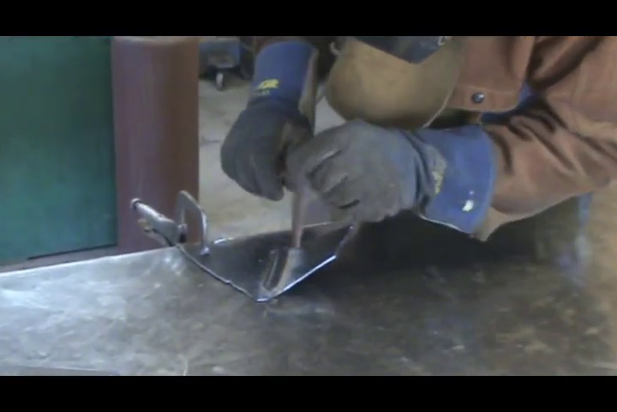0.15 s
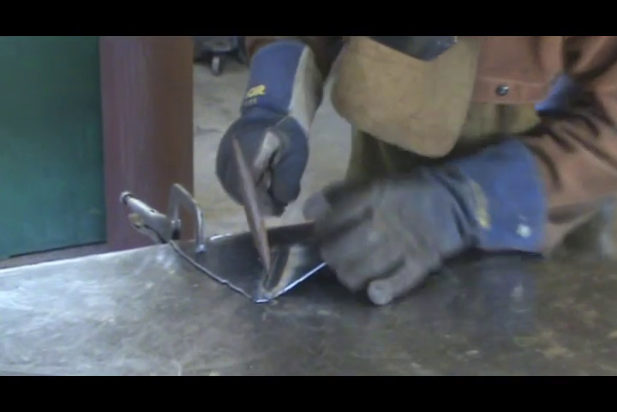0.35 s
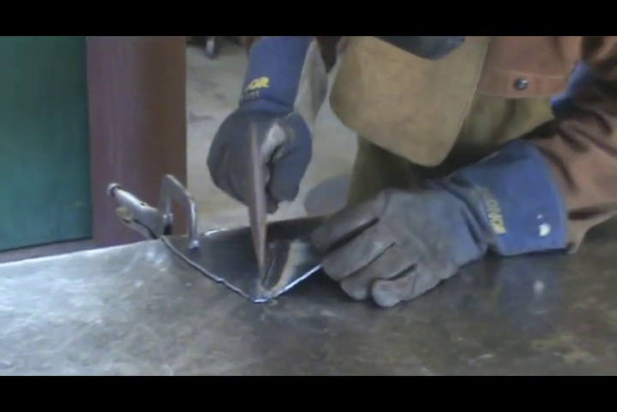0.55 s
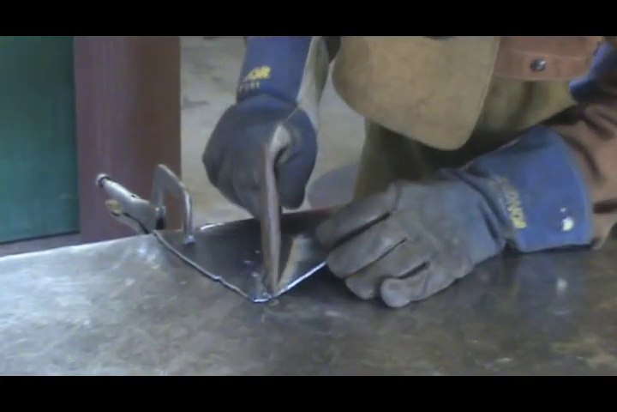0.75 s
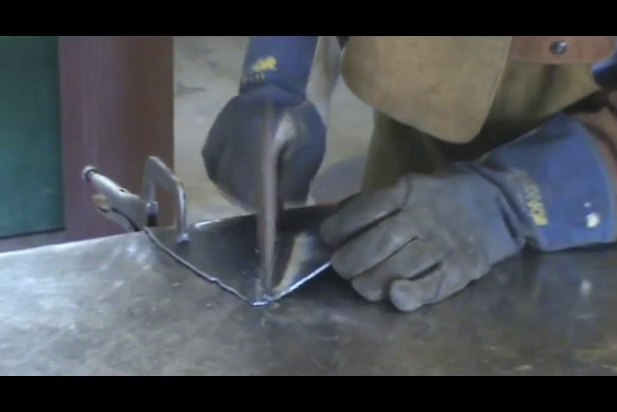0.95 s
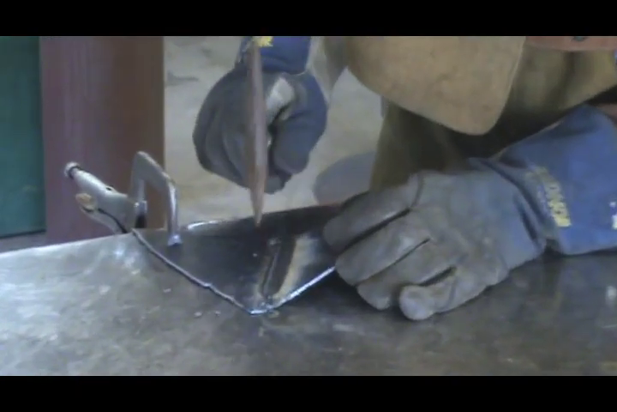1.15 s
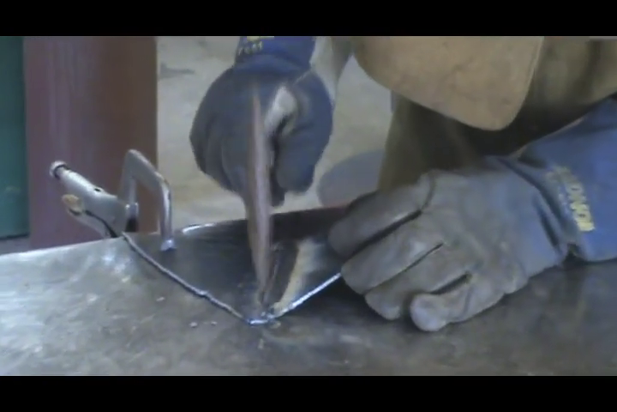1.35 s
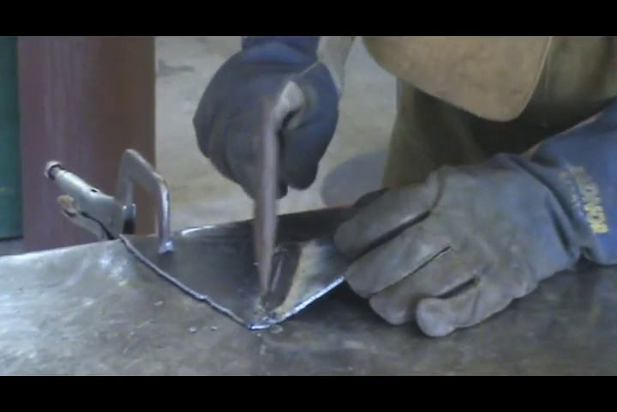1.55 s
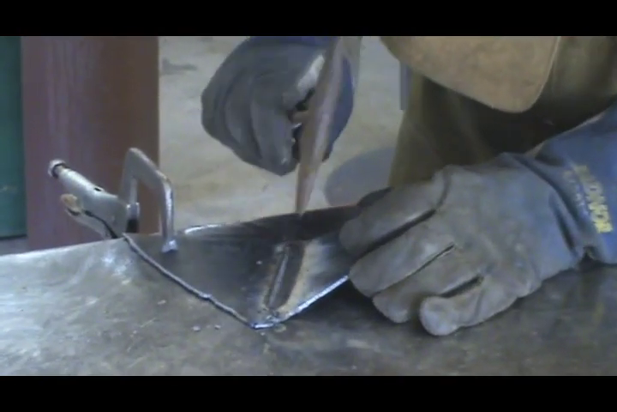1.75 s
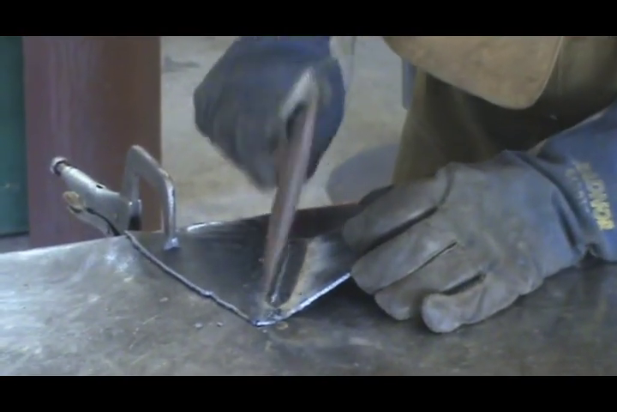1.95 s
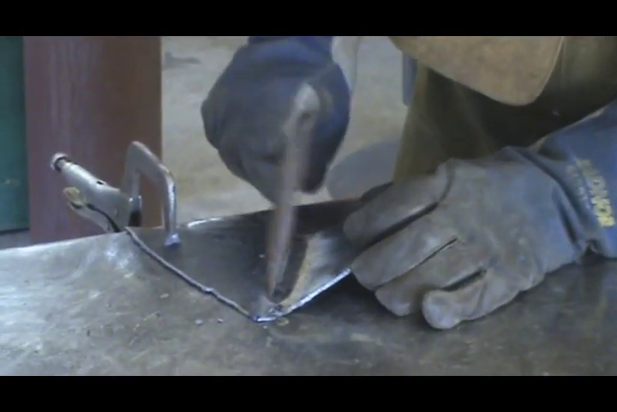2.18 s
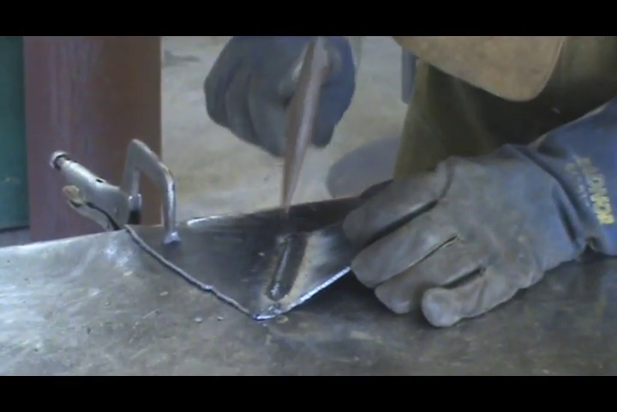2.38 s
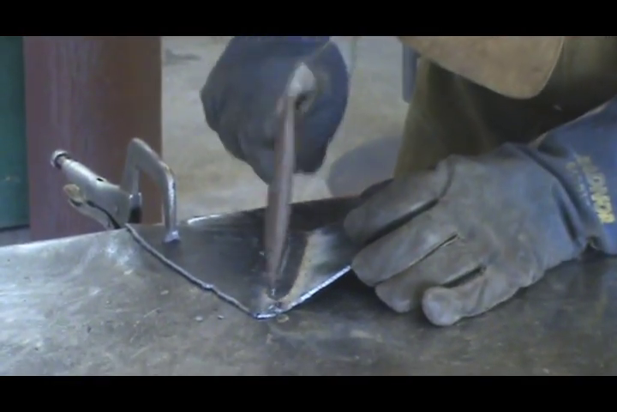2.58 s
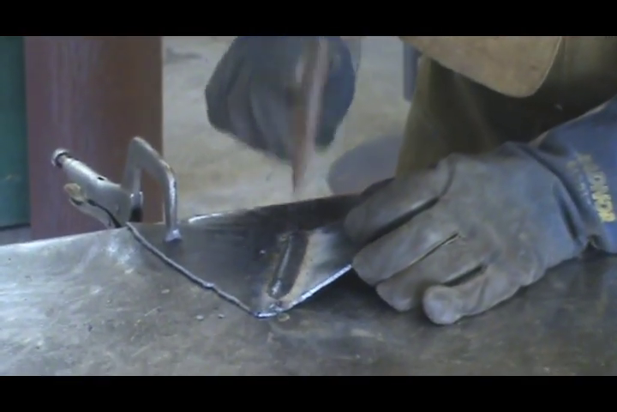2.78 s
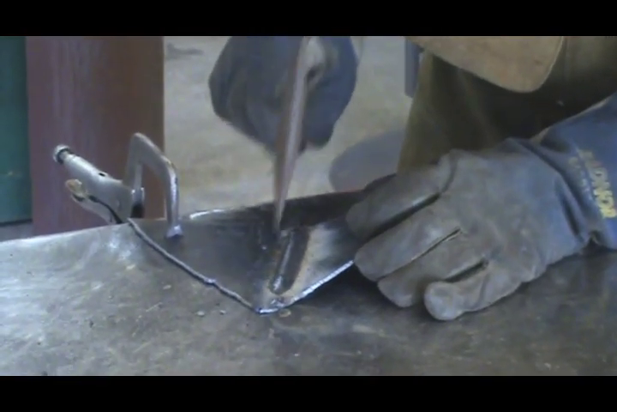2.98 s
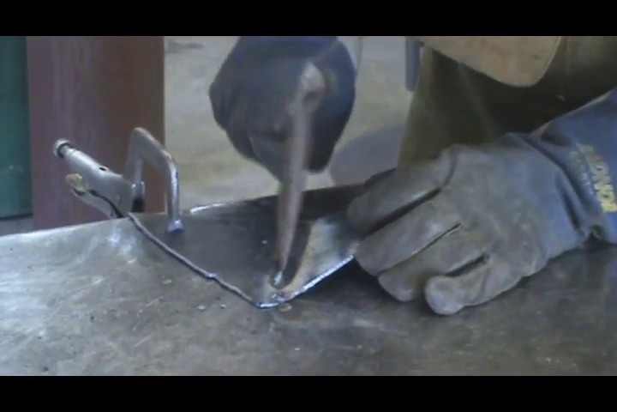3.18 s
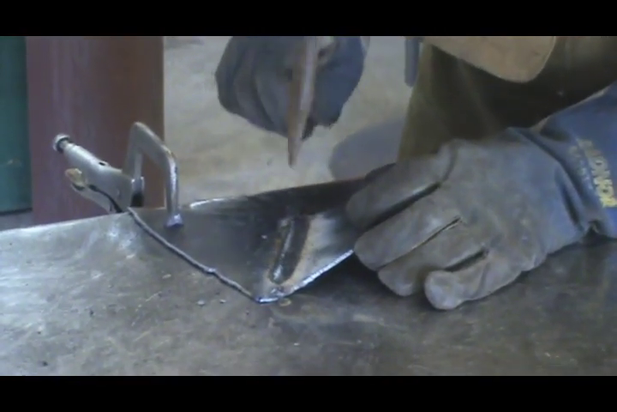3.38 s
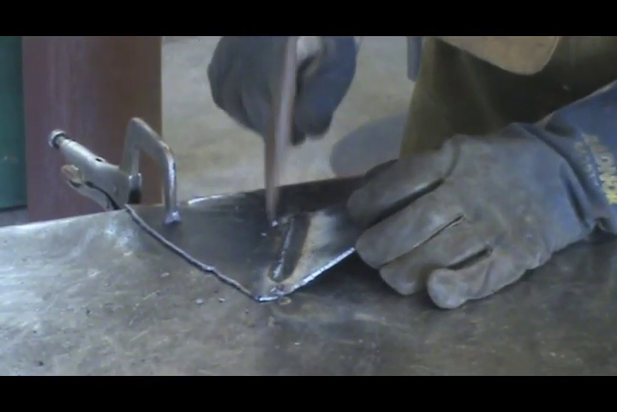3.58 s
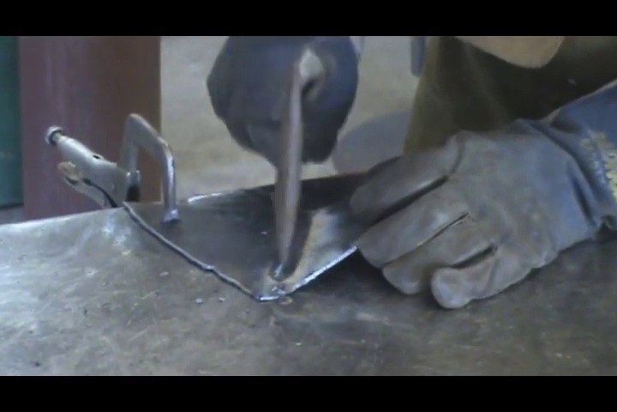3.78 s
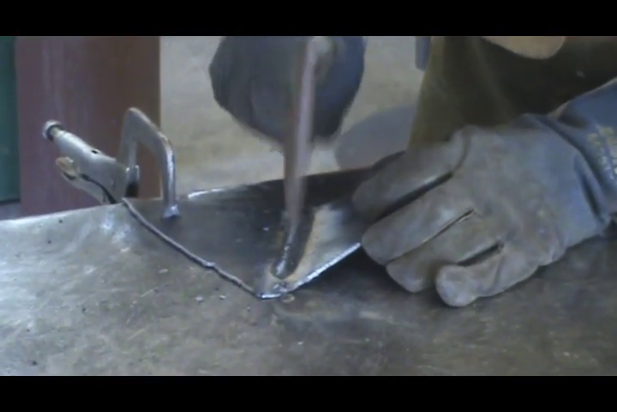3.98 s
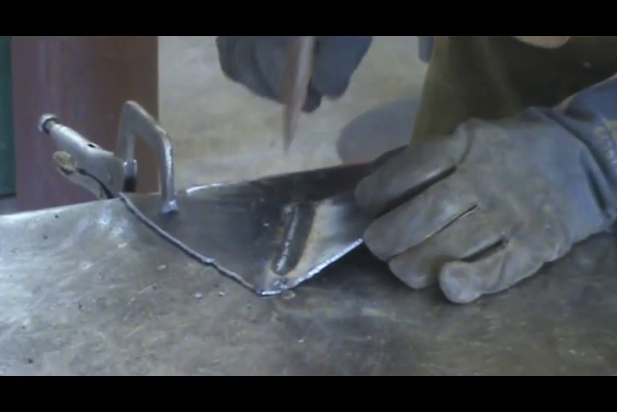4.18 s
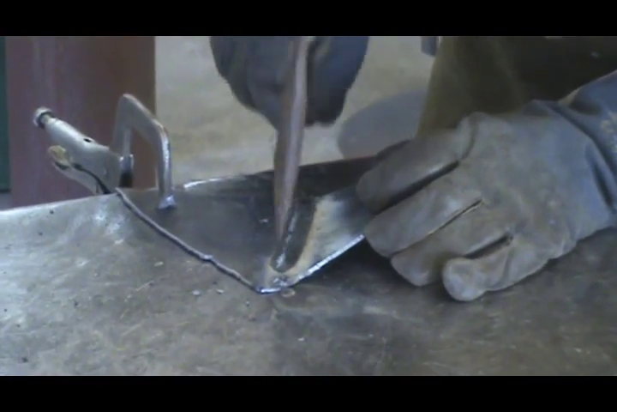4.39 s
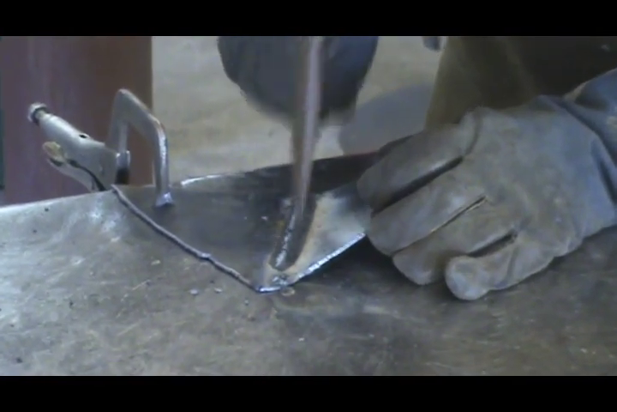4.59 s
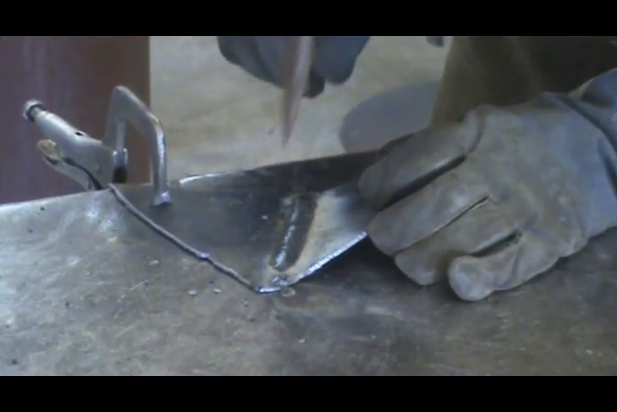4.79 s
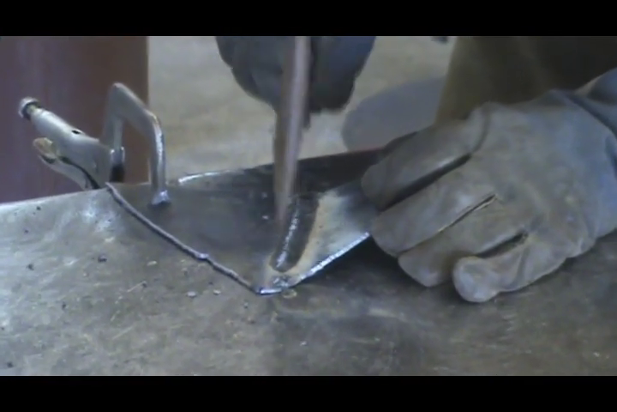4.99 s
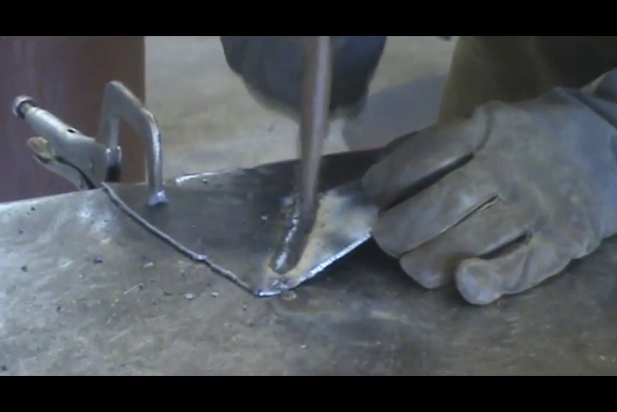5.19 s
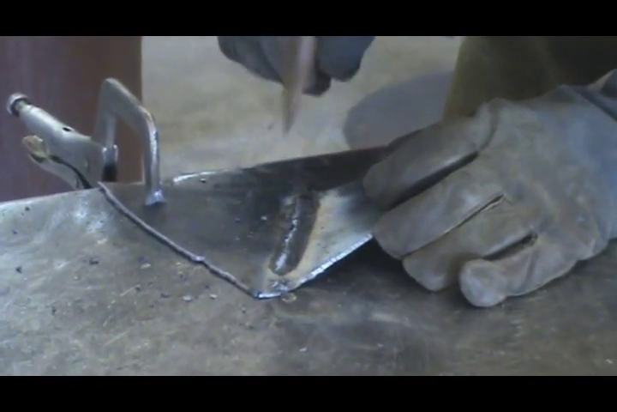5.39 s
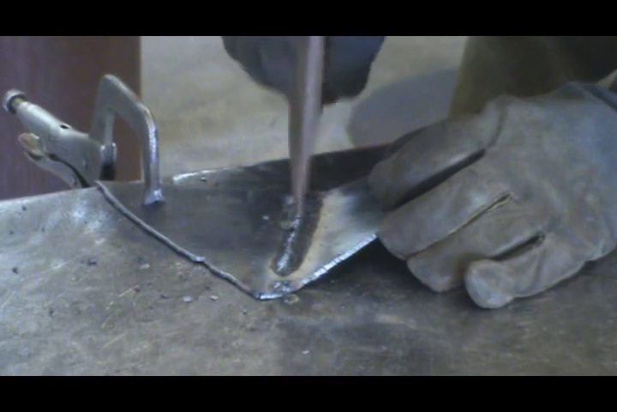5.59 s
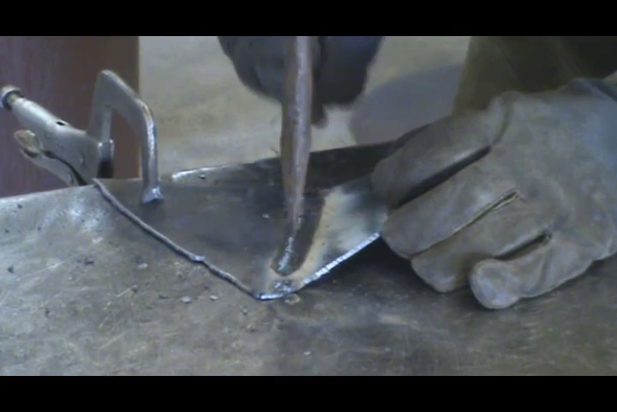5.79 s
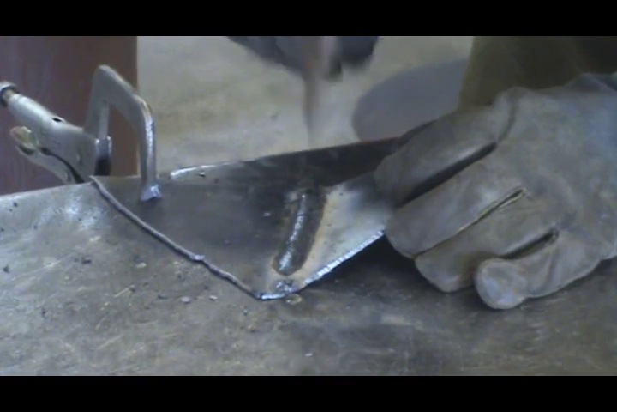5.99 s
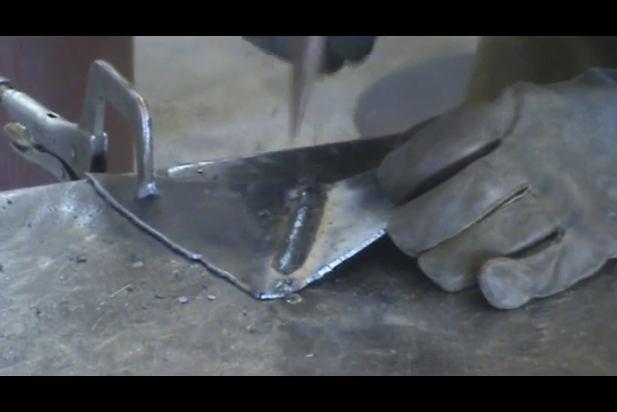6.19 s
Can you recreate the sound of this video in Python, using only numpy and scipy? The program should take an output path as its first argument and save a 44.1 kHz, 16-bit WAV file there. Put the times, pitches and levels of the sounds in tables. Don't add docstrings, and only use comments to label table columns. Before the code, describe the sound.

After a second of glove rustle and faint ticks, sharp metallic hammer blows crack slag off a weld, the plate chattering and ringing.

```python
import sys
import numpy as np
from scipy import signal
from scipy.fft import rfft, irfft
from scipy.io import wavfile
from scipy.ndimage import uniform_filter1d

SR = 44100
rng = np.random.default_rng(int(sys.argv[2]) if len(sys.argv) > 2 else 0)


def inscribe(sig):
    pcm = np.round(np.clip(np.atleast_2d(sig).T, -1, 1) * 32767)
    wavfile.write(sys.argv[1], SR, pcm.astype(np.int16))


def ratio(d):
    e = np.asarray(d, float) / 20
    return 10 ** e


N = 275625
NOISE_HZ = np.fft.rfftfreq(256, 1 / SR)


def evened(x):
    return x / np.sqrt(np.mean(x ** 2) + 1e-20)


def read(points, hz):
    f, value = np.transpose(points)
    return np.interp(np.log(hz + 1), np.log(f + 1), value)


def add(mix, s, sound):
    part = mix[round(s * SR):][:len(sound)]
    part += sound[:len(part)]


def noise(size, shape_db, patchy_db):
    hz = NOISE_HZ[:, None]
    t = np.arange(size // 64 + 5) * 64 / SR
    a, b, patches = rng.standard_normal((len(t), len(hz), 3)).T
    patches = uniform_filter1d(patches, size=3, axis=0)
    patches = evened(uniform_filter1d(patches, size=8, axis=1))
    spectra = (a + 1j * b) * ratio(shape_db(hz, t) + patchy_db * patches)
    return signal.istft(spectra, nperseg=256, noverlap=192)[1][:size]


def ring(t, hz, db, t60, spread_db):
    chance = rng.standard_normal((len(hz), 2))
    start_db = db + spread_db * chance[:, 0]
    level = ratio(start_db[:, None] - 60 * t / np.maximum(t60, .01)[:, None])
    return (level * np.sin(2 * np.pi * hz[:, None] * t + 2 * chance[:, 1:])).sum(0)


# f/Hz, level/dB per Hz
AIR = [(18, -6), (30, 2), (173, -3), (700, -6), (1430, -6), (1790, -8.5), (5910, -18.5), (6550, -15),
       (7070, -22), (11700, -21), (13000, -44)]


def shop():
    white = rfft(rng.standard_normal(N))
    coloured = irfft(white * ratio(read(AIR, np.fft.rfftfreq(N, 1 / SR))), N)
    return ratio(-46.5) * evened(coloured)


def strokes(rows, t):
    s, db, swell, fade = np.transpose(rows)[:, :, None]
    below_top_db = np.where(t < s, swell * (s - t), fade * (t - s))
    return np.sqrt((ratio(db - below_top_db) ** 2).sum(0))


# f/Hz, level/dB per Hz
RUSTLE_COLOUR = [(590, -54), (1000, -24), (1250, -3), (1880, -18), (2140, -3), (8020, -9), (12300, -19),
                 (13000, -48)]
# f/Hz, level/dB per Hz
RUB_COLOUR = [(88, -50), (150, -17), (566, 0), (927, -9), (1030, -10), (1860, -3), (3830, -15.5),
              (6000, -32), (7800, -67), (13200, -120)]
# loudest at t/s, level/dB, swell/dB per s, fade/dB per s
RUSTLE_STROKES = [
    (0.2, -41.5, 697, 170),
    (0.398, -42.5, 180, 2500),
    (0.624, -45, 2500, 100),
    (0.705, -38.5, 178, 151),
    (0.82, -48, 300, 600),
]
# t/s, level/dB, swell/dB per s, fade/dB per s
RUB_STROKES = [
    (0.0, -31, 300, 111),
    (0.2, -44, 500, 150),
    (0.5, -54, 150, 150),
    (0.622, -43, 2500, 250),
    (0.8, -43, 250, 400),
]
# t/s, level/dB, f/Hz
POINT_TICKS = [
    (.092, -23, 2900),
    (.176, -31, 4000),
    (.201, -33, 2900),
    (.585, -30, 734),
    (.614, -38, 2700),
]


def gloves():
    t = np.arange(SR) / SR
    out = np.zeros(N)
    for colour, rows in ((RUSTLE_COLOUR, RUSTLE_STROKES), (RUB_COLOUR, RUB_STROKES)):
        cloth = evened(noise(SR, lambda f, s: read(colour, f), patchy_db=2.0))
        add(out, 0, strokes(rows, t) * cloth)
    ratios = np.array([1.05, 1.3, 1.66, 0.73, .4])
    levels_db = np.array([-1.5, -16.0, -13.0, -11.0, -13.0])
    for s, db, hz in POINT_TICKS:
        tick = ring(t[:900], hz * ratios, levels_db, np.full(5, .009), spread_db=2)
        add(out, s, ratio(db) * tick)
    return out


# f/Hz, width/Hz, level/dB
POINT_MODES = [(725, 140, -26), (905, 310, -10), (1285, 55, -6), (1642, 120, -6.5), (2128, 260, 5.5),
               (2350, 190, 3.5), (2920, 170, 0), (3536, 200, 3.5), (3730, 180, -28), (4565, 162, 4.5),
               (5426, 200, -2), (6770, 87, -2), (8000, 190, -0.5), (8600, 290, -20), (9360, 190, -3.5),
               (9720, 130, -44), (10800, 500, -24.5), (11700, 260, -34.5)]


def landing(crack_db, chatter_db, spot_hz):
    little_chatter = 1 / (1 + np.exp((chatter_db + 18) / 1.5))
    force_db = crack_db + 9
    bench_db = -2.5 + 7.5 * little_chatter - 0.1 * force_db
    treble_db = -1.5 - 2 * little_chatter + 0.069 * force_db
    spot_db = -1 + 9 * little_chatter

    def tone_db(hz):
        low_share = np.clip((1500 - hz) / 400, 0, 1)
        high_share = np.clip((hz - 4500) / 2000, 0, 1)
        return bench_db * low_share + treble_db * high_share

    low_hz = 1287 if crack_db > -8.5 else 1066
    high_hz = 7850 * (1 + 0.0514 * rng.standard_normal())
    spot = [(low_hz, 120, spot_db - 1), (spot_hz, 240, spot_db + 11), (high_hz, 130, spot_db + 4)]
    return bench_db, tone_db, np.transpose(POINT_MODES + spot)


# f/Hz, level/dB per Hz
STEEL_COLOUR = [(71, -63), (120, -78.5), (273, -34), (353, -16), (587, -3.5), (701, -4), (959, 0),
                (1450, -7), (3640, -6), (7080, -12), (9880, -21), (12000, -29), (13000, -73)]


def crack(t, crack_db, tone_db, modes):
    hz, width, db = modes
    point = ring(t, hz, db + .85 * tone_db(hz), 8. / width, spread_db=2.5)
    point /= np.sqrt(np.mean(point[:400] ** 2))
    slag_db = lambda f, s: read(STEEL_COLOUR, f) + 1.82 * f / 1000 + 2.45 * tone_db(f)
    slag = evened(noise(len(t), slag_db, patchy_db=3.5)) * ratio(-60 * t / 0.1)
    onset = 1 - np.exp(-(t / 0.0029) ** 2)
    return ratio(crack_db) * onset * (ratio(-0.9) * point + ratio(-4.5) * slag)


def thump(t, crack_db):
    hump = np.sin(np.pi * np.clip(t / 0.0084, 0, 1)) ** 2
    return ratio(-37 + 2.9 * (crack_db + 9)) * hump


# f/Hz, level/dB, t60/s
PLATE_MODES = [(360, -9, .4), (479, -14, 1.0), (513, -4, .4), (592, -5, .4), (665, -5, .35), (740, -3, .35),
               (921, 14, .23), (945, 1, .25), (995, -1, .3), (1045, -2, .3), (1109, -1, .3), (1209, -1, .3),
               (1254, -3, .35), (1333, -2, .4), (1643, -3, .3), (1738, -3, .4), (1905, 0, .25),
               (2080, -1, .35), (2300, -2, .3), (2405, -2, .28), (2505, -2, .3), (2968, -3, .55),
               (3530, -2, .35), (3671, -3, .42), (4405, -4, .3), (4580, -3, .3), (4726, -6, .42),
               (6940, -7, .3), (7100, -11, .4), (7640, -9, .28)]


def steel():
    t = np.arange(SR // 2) / SR
    click = evened(noise(len(t), lambda f, s: read(STEEL_COLOUR, f), patchy_db=3.0))
    click *= ratio(-60 * t / 0.024)
    both = ratio(6.5) * click + ratio(-13.5) * ring(t, *np.transpose(PLATE_MODES), spread_db=3.0)
    return both / np.linalg.norm(both)


def chatter(t, crack_db, chatter_db, chatter_s, bench_db, tone_db):
    happens, sign, size = rng.random((len(t), 3)).T
    knocks = (happens < 1200 / SR) * np.sign(sign - .5)
    knocks = evened(knocks * ratio(-3.5 * np.log(size + 0.0014)))
    ending = 1 + np.exp(np.clip((t - chatter_s) / 0.0075, -40, 40))
    swell = (0.24 + 1.3 * t / chatter_s) / ending
    scrape = rng.standard_normal(len(t)) * ratio(-60 * t / 0.067)
    drive = ratio(chatter_db - 5) * knocks * swell + ratio(crack_db - 10 - 0.63 * bench_db) * scrape
    tone = np.roll(irfft(ratio(tone_db(NOISE_HZ))), 128)
    return signal.oaconvolve(drive, tone, "same")


def banded(x, depth_db, width_hz):
    z = rfft(x, 2 * len(x))
    bins = max(int(width_hz * 2 * len(x) / SR), 1)
    ridges = evened(uniform_filter1d(rng.standard_normal(len(z)), size=bins))
    return irfft(z * ratio(depth_db * ridges - depth_db ** 2 / 7.9))[:len(x)]


# f/Hz, t60/s
SHOP_DECAY = [(200, 1), (530, 0.42), (1390, 0.35), (3680, 0.37), (7000, 0.33), (11000, 0.28)]


def room(chatter_db, chatter_s, tone_db, modes):
    hz, _, db = modes
    strong_hz = hz[db > -5]

    def level_db(f, s):
        s = s - 128 / SR
        left_s = 0.0077 * np.logaddexp(0, (chatter_s - s) / 0.0072)
        climb_db_per_s = 53.0 + 100.0 * np.clip((1000 - f) / 500, 0, 1)
        bumps_db = 3.15 * sum(1 / (1 + ((f - peak) / 130) ** 2) for peak in strong_hz)
        decay_db = 60 * (s - chatter_s + left_s) / read(SHOP_DECAY, f)
        colour_db = read(STEEL_COLOUR, f) + tone_db(f) + bumps_db - 1.5
        return colour_db - decay_db - climb_db_per_s * left_s

    wash = banded(noise(SR * 2 // 5, level_db, patchy_db=2.0), depth_db=2.1, width_hz=70.)
    steady = np.sqrt(np.mean(ratio(2 * read(STEEL_COLOUR, NOISE_HZ))))
    onset = 1 - np.exp(-np.arange(len(wash)) / SR / 0.0018)
    return ratio(chatter_db - 20.5) * wash / steady * onset


def blow(plate, crack_db, chatter_db, chatter_s, spot_hz):
    t = np.arange(SR // 4) / SR
    bench_db, tone_db, modes = landing(crack_db, chatter_db, spot_hz)
    direct = crack(t, crack_db, tone_db, modes) + thump(t, crack_db)
    out = signal.fftconvolve(chatter(t, crack_db, chatter_db, chatter_s, bench_db, tone_db), plate)
    add(out, 0, room(chatter_db, chatter_s, tone_db, modes))
    no_bass = signal.butter(6, 210, "high", fs=SR, output="sos")
    out = signal.sosfilt(no_bass, out)
    add(out, 0, direct)
    return out


# f/Hz, level/dB, t60/s
RIM_MODES = [(479, -26, 1.1), (1333, -23, .5), (2968, -24, .55)]


def rim(since_first_s, crack_db):
    t = np.arange(SR // 2) / SR
    lines = ring(t, *np.transpose(RIM_MODES), spread_db=1.0)
    return ratio(crack_db - 2.5 * since_first_s) * lines * (1 - np.exp(-t / 0.018))


# t/s, crack level/dB, chatter level/dB, chatter length/s, ring of the spot struck f/Hz
HAMMER_BLOWS = [(0.9266, -9, -10, 0.11, 2000), (1.1985, -9, -9, 0.096, 2020),
                (1.4727, -10, -11.5, 0.076, 2370), (1.7947, -9.5, -20, 0.02, 1916),
                (2.0856, -11, -13.5, 0.098, 1880), (2.404, -10.5, -13.5, 0.093, 2315),
                (2.7541, -7.5, -9, 0.087, 1860), (3.0712, -5, -9, 0.089, 1944),
                (3.3961, -12, -15.5, 0.054, 1937), (3.6972, -4.5, -10.5, 0.089, 1914),
                (3.9835, -10.5, -12, 0.069, 2006), (4.2432, -6, -10, 0.066, 1904),
                (4.5419, -7.5, -12.5, 0.063, 1925), (4.835, -10, -11.5, 0.062, 1830),
                (5.1443, -7.5, -10.5, 0.071, 1880), (5.4292, -8.5, -17.5, 0.025, 1836),
                (5.707, -9.5, -13, 0.038, 2300), (5.962, -3, -10, 0.074, 1850),
                (5.182, -10, -23, 0.012, 1920), (3.742, -15, -25, 0.012, 1970)]


def scene():
    mix = gloves() + shop()
    plate = steel()
    for s, *settings in HAMMER_BLOWS:
        add(mix, s, ratio(11.0) * blow(plate, *settings))
    for s, crack_db, *_ in HAMMER_BLOWS:
        add(mix, s, ratio(11.5) * rim(s - HAMMER_BLOWS[0][0], crack_db))
    return np.array([mix, mix])


def low_pass(x):
    return signal.sosfilt(signal.butter(12, 13200, fs=SR, output="sos"), x)


def record(dry):
    power = signal.lfilter([.012], [1, -.988], dry[0] ** 2)
    power_db = 10 * np.log10(abs(power) + 1e-12)
    climb = np.arange(N) * 38.0 / SR
    held_db = np.maximum.accumulate(power_db + climb) - climb
    over_db = np.maximum(held_db + 31, 0)
    gain_db = -signal.lfilter([.03], [1, -.97], .33 * over_db)
    hot = dry * ratio(gain_db) / .86
    clipped = .86 * np.tanh(hot + hot ** 3 / 3)
    low_cut = signal.butter(2, 177, "high", fs=SR, output="sos")
    clipped = np.clip(signal.sosfilt(low_cut, clipped), -.84, .84)
    band_limit = signal.firwin(301, 12900, window=("kaiser", 8), fs=SR)
    return low_pass(signal.oaconvolve(clipped, band_limit[None], "same"))


dry = scene()
out = record(dry)
inscribe(out)
```